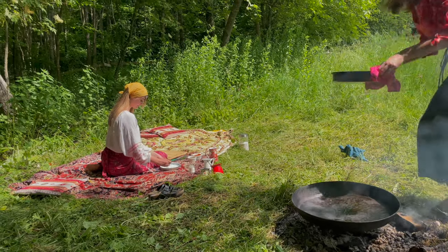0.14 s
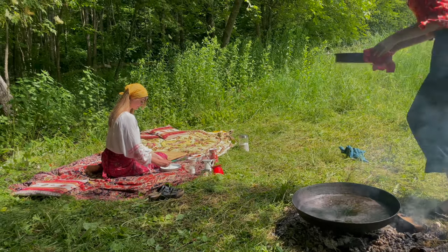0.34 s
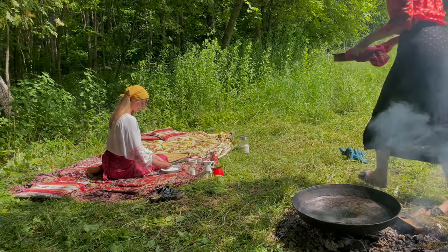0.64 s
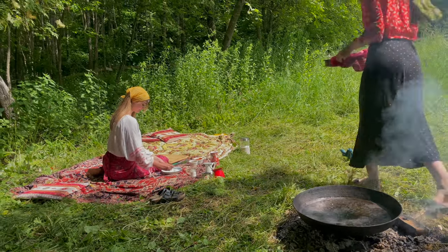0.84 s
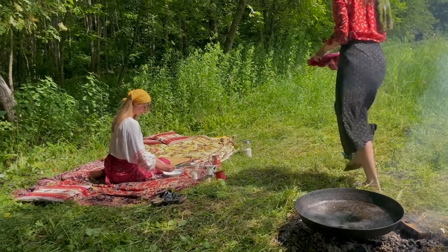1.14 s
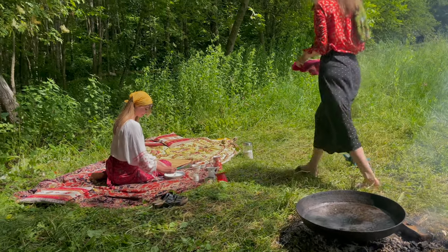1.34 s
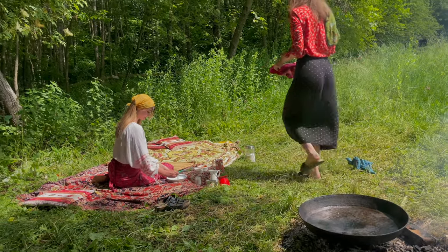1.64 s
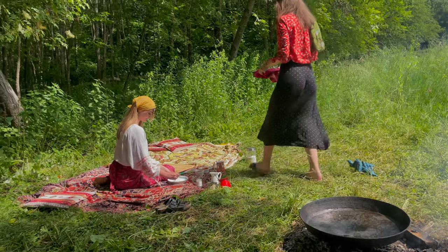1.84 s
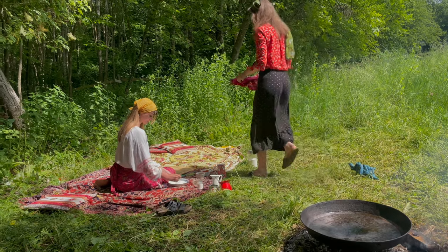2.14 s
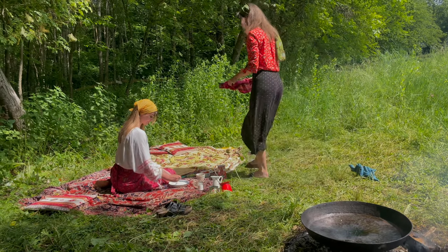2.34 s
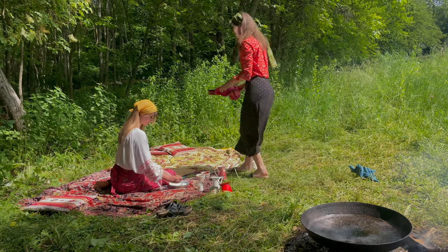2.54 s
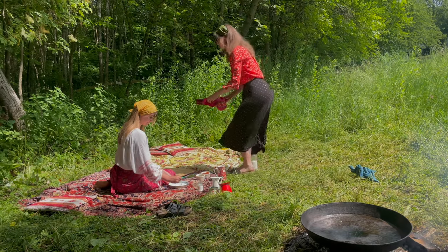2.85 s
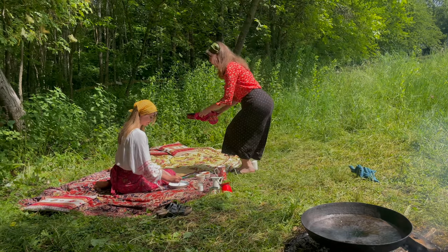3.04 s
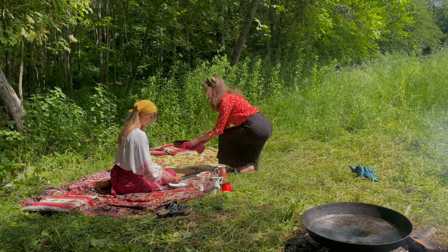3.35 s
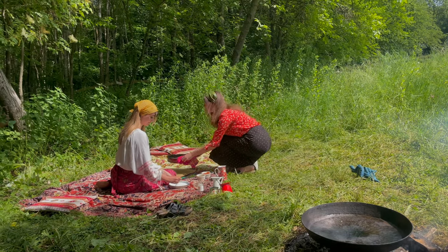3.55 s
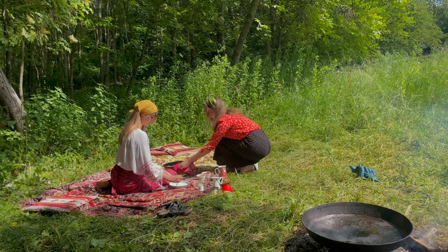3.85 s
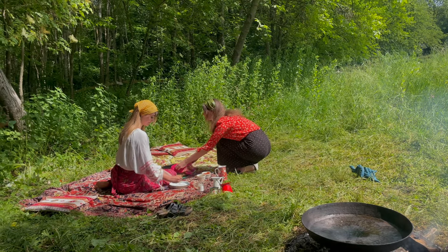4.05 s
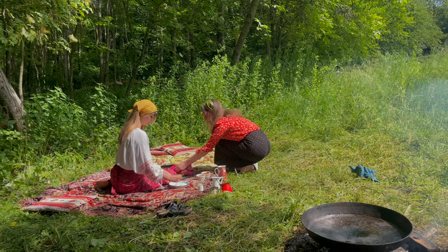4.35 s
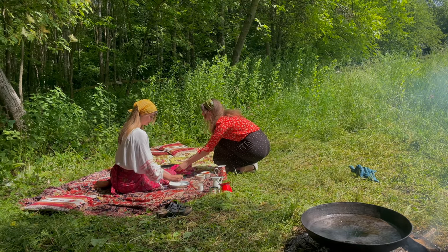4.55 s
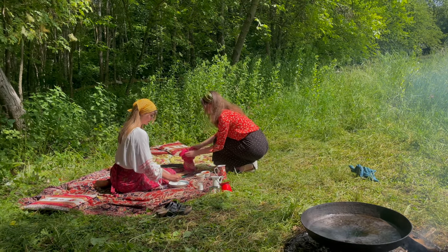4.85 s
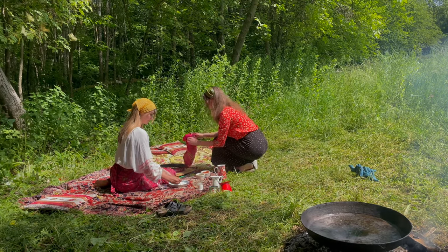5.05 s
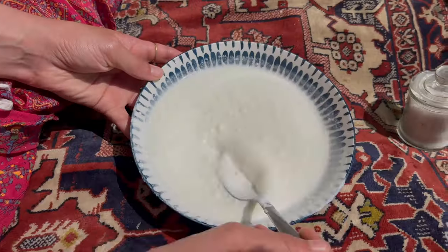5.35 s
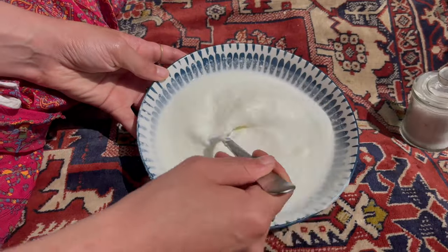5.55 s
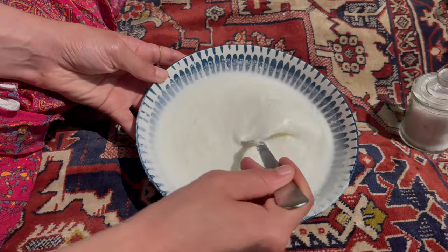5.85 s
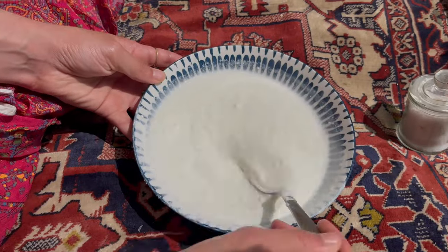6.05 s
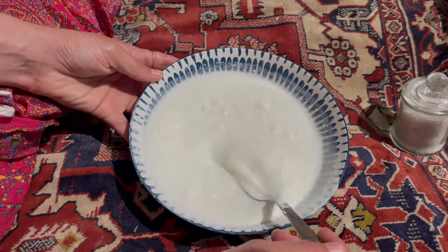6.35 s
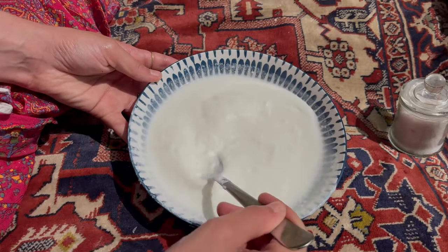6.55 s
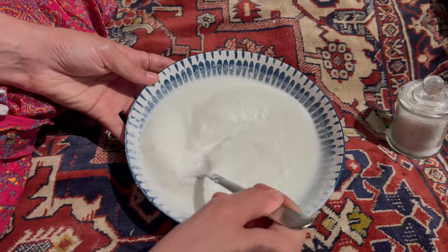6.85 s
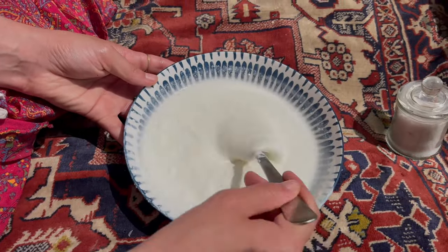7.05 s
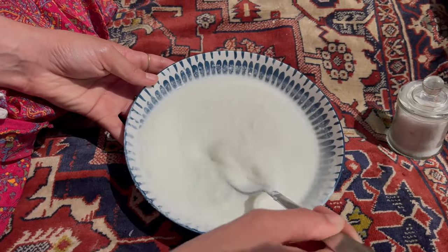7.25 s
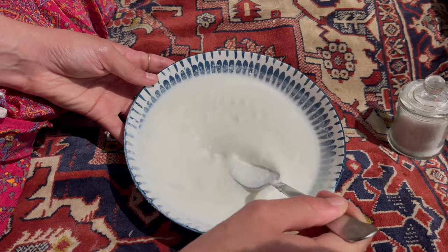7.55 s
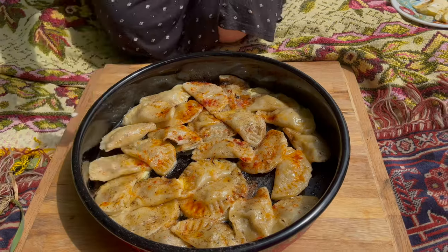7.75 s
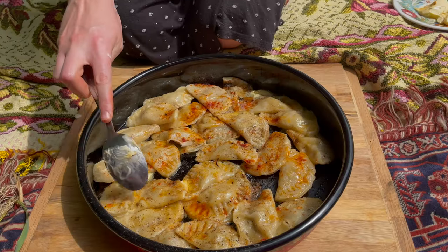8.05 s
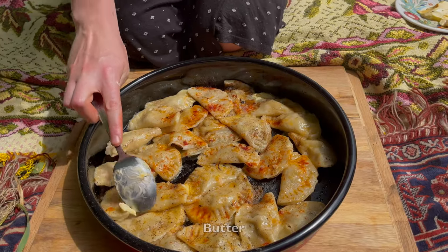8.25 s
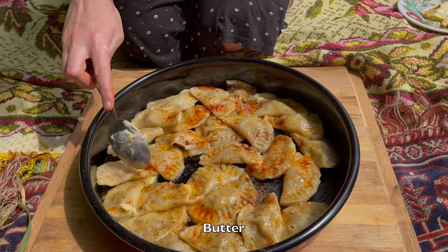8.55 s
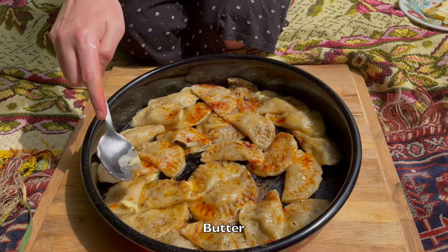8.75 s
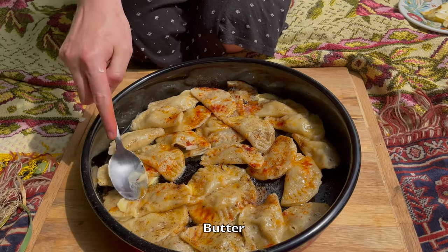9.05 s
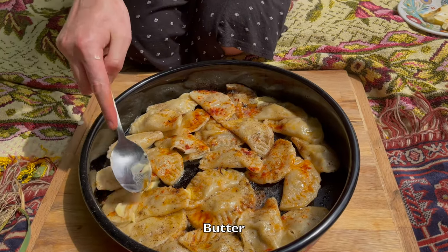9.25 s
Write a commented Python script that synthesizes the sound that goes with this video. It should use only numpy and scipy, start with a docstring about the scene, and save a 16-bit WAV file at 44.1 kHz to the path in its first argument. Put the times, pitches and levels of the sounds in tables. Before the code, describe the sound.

From 0 to 5.4 seconds, a low, uneven fire rumble dominates outdoors, with faint high sizzle and scattered dry snaps. Footsteps brush grass, mainly until 2 seconds, and a fly buzzes barely audibly around 0.3. Small, distant china clinks recur slightly to the left. Fluty birds chirp quickly, most actively from 2.6 to 4.6, over thin trills deep in the trees. Around 3.56 a pan lands with a thud and sharp crack, followed by duller knocks near 4.0 to 4.4 and soft cloth rustling. At 5.4 the rumble stops abruptly. Close and dry, a bright spoon strike on china at 5.6 leads into circular scraping, about three turns per second, with creamy swishes, tiny crackling bubbles and a lighter clink at 6.9. From 7.7, quiet breeze, soft thumps and far birds remain. A spoon ticks metal at 8.8, then strikes the pan at 8.97 with a short bright ring.

```python
"""Picnic at a forest edge

By a fire, a low rumble, fine sizzle and snaps are filtered noise; steps brush grass, a baking pan is set
down with damped knocks, and a bowl is stirred. The rumble stops abruptly: close by, a spoon stirs thick,
crackling cream in china, with friction and struck modes. Last, a spoon clinks on a round metal pan.
Birds sing throughout as gliding, fluttering tones, and a fly buzzes faintly in harmonics of its wingbeat.
"""
import sys
import numpy as np
from scipy import signal
from scipy.fft import rfft, irfft, next_fast_len
from scipy.io import wavfile
from scipy.ndimage import uniform_filter1d, map_coordinates

SR = 44100
rng = np.random.default_rng(int(sys.argv[2]) if len(sys.argv) > 2 else 0)


def wav_out(sig):
    """Save sig, one row per channel (or a flat mono array), as 16-bit PCM at SR to the path in sys.argv[1]."""
    wavfile.write(sys.argv[1], SR, np.round(np.clip(np.atleast_2d(sig).T, -1, 1) * 32767).astype(np.int16))


N = 414540

BOWL_FROM_S, PAN_FROM_S = 5.385, 7.73  # close to the bowl, then close to the pan
TOP_HZ = 15800  # upper band limit

# Table levels are relative; the functions add their own offsets.
# Spoon strikes on the bowl: [t/s, click level/dB, ring level re click/dB, favoured f/Hz]
CLINKS = [(0.167, -40.5, 3, 2220), (0.401, -37, 6.5, 1770), (.457, -36.5, 2, 1750), (0.961, -29.5, 5, 1690),
          (1.52, -27, -7, 1710), (1.5265, -19.5, -27, 1750), (1.598, -28, 0, 2250), (1.822, -34.5, 4, 2260),
          (1.863, -37, 1, 2300), (2.0838, -28, -14, 2300), (2.086, -31, -15, 2300), (2.356, -31.5, 7, 1750),
          (2.422, -37.5, 12, 2830), (2.662, -33, -2, 1700), (3.527, -27, -9, 1710), (3.682, -31, -6, 2300),
          (4.092, -32.5, 6.5, 1790), (4.433, -26.5, -9, 2320), (4.623, -30.5, -10, 1730),
          (4.698, -31.5, -3, 2300), (4.893, -32.5, 7, 1720), (4.986, -33.5, 2, 2370),
          (5.139, -27.5, -4, 2290), (5.204, -36.5, -13, 3450), (5.218, -38, 4.5, 2350),
          (5.582, -5.5, -6.5, 2460), (5.5868, -15, -13, 2490), (5.601, -28, -6, 2400),
          (5.653, -37, 0, 3450), (5.752, -53, 2, 2800), (5.918, -43, 2, 2580), (6.503, -36, -11, 2810),
          (6.545, -41, 4, 2580), (6.867, -17.5, -13, 3600), (7.722, -36.5, -13, 2550)]
# Ringing modes of the china bowl: [f/Hz, level/dB, t60/s]
BOWL_MODES = [(657, -18, .18), (1416, -15, .14), (1690, -17, .18), (1750, -5.5, .07), (2355, -7, .15),
              (2560, -10, .05), (2830, -12, .07), (3478, -7, .16), (4290, -10, .05), (4720, -12, .09),
              (5146, -18, .1), (8118, -28, .08)]
# Quickly damped modes of spoon and bowl in contact: [f/Hz, level/dB, t60/s]
CONTACT_MODES = [(1097, -4, 0.017), (1387, -24, 0.012), (1878, 2.5, 0.017), (2610, -5.5, 0.029),
                 (3362, -0.5, 0.03), (3824, -6, 0.03), (4264, -1.5, 0.028), (4650, 1, 0.022),
                 (5400, -34, 0.04), (5850, -15, .028), (7240, -21.5, 0.022), (8280, -22, 0.028)]
# Click spectrum of the china: [f/Hz, level/dB per Hz]
CHINA_CLICK = [(200, -51), (450, -38), (750, -5), (1300, 3), (1900, 1.5), (2500, 8.5), (3000, 2.5),
               (3450, 6), (3900, 3), (4350, -3), (5200, 7.5), (6500, -7), (8300, -4), (10500, -16),
               (15000, -20)]
# Colour of the bowl from afar: [f/Hz, level/dB]
DISTANCE = [(900, -1.5), (1800, 4.5), (2400, 5), (3500, -1), (4500, -4), (12000, -6)]
# Below this force the spoon stays on the wall and shortens the ring to this share
BOUNCE_DB, RESTING_SHARE = -18, .7
CLICK_DB, CONTACT_DB, SPOT_DB = -11, -15.5, 12  # shares of a clink; lift of the favoured mode

# Spoon strikes on the pan: [t/s, level/dB, crack t60/s, ring level re crack/dB]
PAN_HITS = [(8.809, -22.5, 0.011, -33), (8.9673, -20.5, 0.082, 5)]
# Long ringing modes of the pan wall: [f/Hz, level/dB, t60/s]
PAN_MODES = [(238, -14, .08), (593, -14, .13), (639, -12, .14), (1077, 0, .42), (1110, 0, .08),
             (1405, -10.5, .32), (1610, -10, .38), (1787, -19, .25), (2460, -19, .14), (3420, -19, .12),
             (1997, -8, .21), (2234, -11, .4), (2724, -22, .35), (2961, -8, .29), (3192, -23, .35),
             (3881, -16, .24), (4339, -12, .13), (4654, -16, .22), (4748, -19, .3), (5071, -9, .1),
             (5356, -14, .19), (5440, -17, .13), (6562, -19, .12), (6982, -20, .11), (7424, -16, .16),
             (7887, -19, .09), (8360, -23, .12), (9900, -25, .1), (11020, -19, .13)]
# Short bright modes of the rim and thump of the pan on its board: [f/Hz, level/dB, t60/s]
RIM_MODES = [(405, -4.5, 0.04), (590, 3.5, 0.035), (4740, -6.5, 0.18), (6200, 1, 0.07), (7350, -6, 0.038),
             (7800, 3, .04), (9070, -2, .05), (12400, -3, .03)]
# Spectra of a graze and of a blow on steel: [f/Hz, level/dB per Hz]
GRAZE_TICK = [(300, -20), (1100, -8), (1850, 11), (2800, 1), (4000, -6), (5500, 11.5), (8000, -13),
              (14000, -30)]
STEEL_CLICK = [(100, -31), (250, 6), (450, 6.5), (1100, -5), (3000, -1.5), (5000, -9), (7000, 3.5),
               (10000, -4), (15000, -16)]
WALL_DB, RIM_DB = -12, -14.5  # the long ring and the short one

# Scraping half of each turn of the spoon: [t/s, width/s, level/dB]
TURNS = [(5.548, 0.05, -45), (5.898, 0.057, -46.5), (6.209, .05, -47.5), (6.522, 0.056, -46.5),
         (6.795, 0.057, -48.5), (7.13, 0.025, -54.5), (7.425, 0.04, -46.5), (7.718, .025, -58)]
# Gliding half of each turn: [t/s, width/s, level/dB, favoured f/Hz]
GLIDES = [(3.1, 0.086, -61.5, 1720), (3.39, 0.054, -58.5, 1700), (3.65, 0.033, -57, 1750),
          (3.98, 0.07, -57.5, 1750), (5.43, 0.05, -55.5, 2720), (5.755, 0.048, -54, 2740),
          (6.075, 0.071, -52.5, 2280), (6.39, 0.083, -52.5, 1980), (6.68, 0.056, -53, 1670),
          (7.05, 0.11, -55.5, 2178), (7.324, 0.085, -53, 1940), (7.6, 0.11, -53.5, 2140),
          (7.73, .05, -62, 1672)]
# Bowl resonances under the scraping spoon: [f/Hz, width/Hz, level/dB]
RUBBED = [(1178, 110, -11), (1550, 55, -7.5), (2430, 400, -2.5), (2698, 108.4, 5), (3950, 780, -12)]
# Narrow tones of the bowl under a gliding spoon: [f/Hz, level/dB]
SINGING = [(1670, -5), (2760, -4.5), (3580, -17), (4020, -9), (4760, -6)]
# Spectrum of cream pushed by the spoon: [f/Hz, level/dB per Hz]
SWISH = [(450, -34.5), (900, 6.5), (3000, 2.5), (5000, 8.5), (6500, -2), (8300, -4), (10500, -23),
         (15000, -17)]
# Catches of steel on the glaze: rate, its scatter, size scatter, fine friction between them
SLIPS_PER_S, SLIP_UNEVEN, SLIP_SPREAD_DB, GRIT_DB = 280, .4, 4.5, -8
SINGING_LIFT_DB = 8  # lift of the tone that a glide favours
SLOSH_SHARE = .017  # scale of the bend that moving cream gives the bowl's tones
GLIDE_RUB_DB = -9  # light rubbing in a glide, relative to the glide
SWISH_DB, GLIDE_SWISH_DB = -10.5, -7.5  # cream pushed by each half turn, relative to it

# Cream closing behind the spoon: [t/s, width/s, level/dB]
SQUELCHES = [(5.735, 0.014, -52.5), (6.04, 0.016, -56), (6.365, 0.023, -55.5), (6.51, 0.015, -58),
             (6.8, .024, -54), (7.29, 0.045, -53.5), (7.42, .02, -63), (7.59, 0.095, -56.5),
             (7.74, 0.048, -56.5)]
# Spectrum of the tiny bubbles: [f/Hz, level/dB per Hz]
BUBBLES = [(1200, -15), (2600, -2), (3700, 14.5), (4400, -2), (6200, -13), (7700, 0.5), (9200, -9.5),
           (11000, -17), (15000, -24)]
# Single wet pops: [t/s, level/dB, f/Hz]
POPS = [(6.575, -54, 4640), (7.043, -46, 5740), (7.311, -49, 7400)]
BUBBLES_PER_S, POP_T60_S = 1500, 0.028

# Dull knocks of feet, pan and board: [t/s, level/dB, main resonance f/Hz, upper reach f/Hz]
KNOCKS = [(1.526, -34.5, 1100, 1400), (2.083, -25, 230, 397), (3.562, -18.5, 219, 347),
          (3.565, -27, 600, 1090), (3.585, -26.5, 850, 950), (3.76, -35.5, 600, 900),
          (4.004, -16.5, 360, 1240), (4.2634, -21, 450, 830), (4.389, -31.5, 336, 700),
          (4.419, -21.5, 700, 930), (5.425, -33, 298, 390), (5.49, -35, 263, 430), (7.745, -34, 377.6, 497),
          (7.823, -40, 263, 500), (7.894, -41.5, 330, 470), (8.255, -32, 260, 563)]
# Modes of the board: [f/Hz, level/dB, t60/s]
BOARD_MODES = [(345, 6, 0.088), (613, -10, 0.2), (938, -8.5, 0.057), (1114, -3, 0.095), (1217, -7.5, 0.079),
               (1725, -4, 0.032), (2190, -6.5, 0.024)]
KNOCK_T60_S = 0.048
HARD_KNOCK_DB = -22  # above this force the board's ring grows faster than the knock
BOARD_DB, BOARD_GROWS = -27, 2.96  # ring relative to a knock; dB gained per dB of extra force

# Embers and twigs snapping: [t/s, level/dB]
SNAPS = [(.102, -46), (.183, -47.5), (0.242, -33.5), (.573, -38), (0.643, -35), (.684, -37), (0.948, -34),
         (1.239, -38), (3.031, -28.5), (3.563, -9), (3.574, -26), (3.584, -12.5), (5.217, -32.5),
         (5.223, -35.5)]
# Spectrum of a snap: [f/Hz, level/dB per Hz]
SNAP = [(200, 9), (1000, -2), (2700, -18.5), (3700, 2.5), (4400, -2.5), (6100, 2.5), (7900, -5.5),
        (9500, -1), (11000, -1.5), (12500, 4.5), (16000, -15.5)]

# Fluty tones: a singer nearby, except the first row, the far bowl singing under the spoon: [t/s, length/s, f/Hz
# at start, one third, two thirds and end, level/dB, flutter/Hz]
NOTES = [(2.15, .15, 1880, 1840, 1770, 1700, -59, 15), (2.638, .04, 3300, 3200, 3020, 2950, -51, 40),
         (2.664, .026, 3350, 3500, 3500, 3400, -54, 30), (2.67, .04, 2850, 3150, 3280, 2900, -53, 50),
         (2.703, .016, 3350, 3480, 3450, 3300, -56, 50), (2.935, .024, 3330, 3220, 3080, 2950, -52, 30),
         (2.97, .027, 2880, 3020, 3070, 3020, -48, 15), (3.08, .044, 3470, 3530, 3570, 3520, -51, 15),
         (3.128, .026, 4100, 3980, 3880, 3780, -53, 50), (3.196, .036, 3020, 2920, 2880, 2950, -50, 20),
         (3.228, .034, 2950, 3120, 3050, 2850, -50.5, 25), (3.335, .036, 2770, 2790, 2850, 3020, -55, 20),
         (3.368, .05, 3000, 3280, 3100, 2480, -46.5, 20), (3.459, .052, 2640, 2650, 2740, 2680, -52, 25),
         (3.668, .066, 2650, 2870, 2650, 2520, -53, 25), (3.738, .026, 4050, 3930, 3880, 3820, -55, 50),
         (3.805, .03, 3050, 3130, 3180, 3170, -55, 15), (3.836, .056, 3220, 3240, 3290, 3350, -46, 15),
         (3.885, .042, 3350, 3270, 3050, 2850, -49.5, 20), (4.028, .05, 4600, 4300, 4130, 4050, -54, 130),
         (4.068, .06, 4020, 3830, 3760, 3780, -51, 50), (4.256, .055, 3650, 3300, 2900, 2700, -53, 110),
         (4.448, .055, 3900, 3880, 3720, 3600, -52, 110), (4.558, .11, 2820, 2960, 2900, 2770, -48.5, 12)]
# Thin phrase from deep in the trees: [t in phrase/s, length/s, start f/Hz, end f/Hz, level/dB, buzz/Hz]
PHRASE = [(0, 0.064, 5300, 4550, 6, 80), (0.18, 0.091, 6400, 6700, 5.5, 350),
          (0.351, 0.084, 4410, 4350, 6.5, 80), (0.437, 0.336, 4980, 4960, 4.5, 140),
          (0.949, 0.18, 7300, 6600, 4.5, 80)]
# Each time the phrase is sung: [t/s, level/dB]
PHRASES = [(0.047, -62.5), (6.555, -59.5)]
# Single far trills, except the row at 2.771 s, the far bowl singing under the spoon: [t/s, length/s, start
# f/Hz, end f/Hz, level/dB]
TRILLS = [(1.82, 0.12, 6370, 6190, -60.5), (2.434, 0.36, 2370, 2286, -57.5), (2.771, 0.14, 1794, 1720, -58),
          (3.228, 0.152, 4050, 3960, -65.5), (3.389, 0.64, 4970, 4880, -62.5),
          (4.11, 0.12, 3810, 3790, -65), (6.172, 0.21, 5330, 5060, -57.5), (6.227, 0.33, 4510, 4390, -61),
          (7.012, 0.07, 4950, 4820, -59), (7.682, 0.11, 4750, 3650, -59), (7.849, 0.14, 3400, 3090, -62.5),
          (8.096, 0.25, 4030, 3400, -63.5), (8.285, 0.14, 4420, 4080, -69), (8.361, 0.18, 3440, 3100, -70),
          (8.569, 0.15, 2280, 2740, -76), (9.13, 0.153, 5350, 5390, -66), (9.218, 0.14, 2970, 3420, -63)]
SINGER_DB = -0.5  # overall offset of the fluty tones
TRILL_BUZZ_PER_S = 0.17  # longer trills buzz more deeply

# Fire rumble and sizzle over time: [t/s, level/dB]
RUMBLE = [(0.0, -41.5), (1.69, -49.5), (2.27, -45), (2.59, -47.5), (3.63, -39), (4.5, -44), (5.2, -40.5)]
SIZZLING = [(0.0, -63), (0.63, -65.5), (0.8, -59.5), (1.11, -67), (1.51, -59.5), (1.9, -59.5),
            (2.19, -68.5), (2.73, -62), (3.03, -74.5), (3.58, -68.5), (4.11, -75.5), (4.7, -72),
            (5.25, -68)]
# Spectra of the deepest rumble, the roar and the sizzle: [f/Hz, level/dB per Hz]
DEEP = [(12, -40), (20, -29), (36, -13.5), (54, -3.5), (74, -3), (113, -17), (140, -12.5), (180, -29),
        (310, -120)]
ROAR = [(59, -40.5), (100, -3), (119, -3.5), (231, 4), (297, 3), (403, -11.5), (453, -12.5), (556, -35.5),
        (650, -41), (840, -55.5), (1430, -120)]
SIZZLE = [(3820, -33.5), (6500, 1), (7560, -19.5), (9510, -16), (11000, 7.5), (12200, 7.5), (15600, -9),
          (16000, -10)]
SIZZLE_SURGE_DB = 4.6  # scale of the quick surges
DEEP_DB, DEEP_FOLLOWS = -44, 0.23  # the deepest layer: mean level, share of the rumble's swings

# Feet brushing through grass: [t/s, width/s, level/dB]
STEPS = [(.3, 0.1, -54.5), (.8, 0.045, -55), (0.932, 0.078, -48), (1.31, 0.11, -48), (1.56, 0.18, -60),
         (1.88, 0.15, -53), (2.08, 0.05, -59), (2.6, 0.76, -57.5), (3.57, 0.072, -47.5)]
# Spectrum of the grass: [f/Hz, level/dB per Hz]
GRASS = [(300, -46), (900, 2), (1800, 6.5), (4000, 1), (7000, -1.5), (14000, -14)]
# Cloth handled around the pan: [t/s, width/s, level/dB]
RUSTLES = [(3.345, 0.038, -51.5), (4.55, 0.18, -53)]
# Spectrum of the cloth: [f/Hz, level/dB per Hz]
CLOTH = [(150, -24), (400, -6), (700, 5), (950, -4), (1450, -11), (4500, -40)]

# Overtones of the fly: [multiple of the wingbeat, level/dB]
FLY = [(4, -3.5), (5, 3.5), (6, 2.5), (7, -2), (8, -1)]

# Forest spectra by the fire and in the close views: [f/Hz, level/dB per Hz]
FOREST_WIDE = [(200, 9), (500, 4), (900, -3), (1300, -4), (1700, 5), (2300, -0.5), (4700, -1),
               (5700, -11.5), (8500, -19), (13000, -26), (20000, -79)]
FOREST_CLOSE = [(150, -12), (300, -8.5), (600, -9.5), (1000, -13), (1500, -2), (2500, -7), (4000, -8.5),
                (5200, -13), (6800, -24), (12000, -38)]
# Spectra of the breeze and the even hiss: [f/Hz, level/dB per Hz]
WIND = [(12, -9), (20, -0.5), (39, -4.5), (54, -11.5), (107, -16), (189, -23.5), (400, -35.5), (520, -62),
        (880, -120)]
HISS = [(500, 2), (5000, -8), (9500, 0), (11000, -4), (14200, -9), (16000, -18)]
BREEZE_BOWL_DB, BREEZE_PAN_DB, GUST_DB = -53, -48, 2  # breeze near bowl and pan, scale of its swings
# Echo of the trees: [f/Hz, t60/s]
TREES = [(200, 0.23), (2000, 0.58), (6000, 0.88), (14000, 0.29)]


def amp(db):
    """Level: decibels to linear gain."""
    return 10 ** (np.asarray(db) / 20)


def unit(x):
    """Normalisation: scale to rms 1."""
    return x / np.sqrt(np.mean(x ** 2) + 1e-20)


def along(points, hz):
    """Interpolation of (f/Hz, value) points on a logarithmic frequency axis."""
    f, v = np.transpose(points)
    return np.interp(np.log(hz + 1), np.log(f + 1), v)


def clock(length):
    """Sample times of a short sound."""
    return np.arange(int(length * SR)) / SR


def curve(rows):
    """Linear interpolation of (t/s, value) rows to one value per sample."""
    s, values = np.transpose(rows)
    return np.interp(np.arange(N) / SR, s, values)


def shot(start, end):
    """Gating: 1 between two times, 0 outside, with brief ramps."""
    t = np.arange(N) / SR
    return uniform_filter1d(1. * ((t >= start) & (t < end)), size=128)


def swell(s, width, order=2):
    """Envelope: width seconds wide at half power; a higher order has steeper edges."""
    distance = np.abs(2 * (np.arange(N) / SR - s) / width)
    return 2 ** (-.5 * np.minimum(distance ** order, 80))


def swells(rows):
    """Superposition of (t/s, width/s, level/dB) envelopes."""
    return sum(amp(db) * swell(s, width) for s, width, db in rows)


def wobble(rate, n):
    """Random modulation: a smooth curve with rate knots a second."""
    knots = rng.standard_normal(int(n * rate / SR) + 4)
    return map_coordinates(knots, [np.arange(n) * rate / SR])


def filtered(x, response):
    """Linear filtering: multiply the spectrum by a response of frequency."""
    n = x.shape[-1]
    m = next_fast_len(n + 8192)
    return irfft(rfft(x, m) * response(np.fft.rfftfreq(m, 1 / SR)), m)[..., :n]


def shaped(x, spectrum):
    """Spectral colouring by a table of levels."""
    return filtered(x, lambda hz: amp(along(spectrum, hz)))


def noise(spectrum, n):
    """Coloured noise: shaped Gaussian noise of rms 1."""
    return unit(shaped(rng.standard_normal(n), spectrum))


def wide(spectrum, side_db):
    """Stereo coherence: a common noise plus an independent one in opposite phase."""
    return noise(spectrum, N) + amp(side_db) * np.array([[1], [-1]]) * noise(spectrum, N)


def leaning(x, left_db):
    """Interaural level difference: shift a stereo sound to the left."""
    return x * amp(np.array([[left_db], [-left_db]]) / 2)


def add(track, s, sound):
    """Superposition: mix a sound in at s seconds."""
    part = track[max(round(s * SR), 0):][:len(sound)]
    part += sound[:len(part)]


def ring(modes, t, scatter_db):
    """Modal decay: exponentially damped sines with new strengths and phases at each strike."""
    out = 0
    for hz, db, t60 in modes:
        decay = amp(db + scatter_db * rng.normal() - 60 * t / t60)
        out = out + decay * np.sin(2 * np.pi * (hz * t + rng.random()))
    return out


def burst(spectrum, t, t60):
    """Contact noise: a decaying burst whose energy depends on its decay alone."""
    fade = amp(-60 * t / t60)
    x = noise(spectrum, len(t)) * fade
    return x * np.linalg.norm(fade) / np.linalg.norm(x)


def outdoors(x, wet_db, spread_db):
    """Outdoor scattering: direct sound, quick scatter from nearby things, and the echo of the trees."""
    hz, t, z = signal.stft(rng.standard_normal((2, SR // 2)), SR, nperseg=256)
    decay = amp(-60 * t / along(TREES, hz)[:, None])
    tail = signal.istft(z * decay, SR, nperseg=256)[1]
    echo = signal.fftconvolve(x[None], tail / np.linalg.norm(tail[0]), axes=1)[:, :N]
    near = rng.standard_normal(512) * amp(-60 * np.arange(512) / SR / 0.066)
    side = signal.fftconvolve(x, near / np.linalg.norm(near))[:N]
    return x + amp(wet_db) * echo + amp(spread_db) * np.array([side, -side])


def bowl_clinks():
    """Impact excitation: a hard click, then modes damped by the cream and favoured by the struck spot."""
    out, t = np.zeros(N), clock(0.51)
    for s, db, ring_db, spot_hz in CLINKS:
        click = amp(CLICK_DB) * burst(CHINA_CLICK, t, t60=0.022)
        click = click + amp(CONTACT_DB) * ring(CONTACT_MODES, t, scatter_db=.7)
        # moving cream detunes the bowl a little from hit to hit
        load = 1 + rng.normal(0, .004)
        ring_share = 1 if db > BOUNCE_DB else RESTING_SHARE
        modes = []
        for hz, level, t60 in BOWL_MODES:
            # the mode with an antinode at the struck spot gets the largest lift
            lift_db = SPOT_DB * np.exp(-(np.log(hz / spot_hz) / 0.061) ** 2)
            modes.append((hz * load, level + lift_db, t60 * ring_share))
        ringing = amp(ring_db - 20.5) * ring(modes, t, scatter_db=0.5)
        onset = 1 - np.exp(-t / 0.000143)
        add(out, s, amp(db) * (click + ringing) * onset)
    afar = shot(0, BOWL_FROM_S)
    distant = outdoors(shaped(out * afar, DISTANCE), wet_db=-8, spread_db=-3.0)
    close = outdoors(out * (1 - afar), wet_db=-36, spread_db=-49)
    return leaning(distant, left_db=9) + close


def pan_clinks():
    """Impact on steel: a graze mostly ticks; a blow cracks brightly and sets the wall ringing."""
    out, t = np.zeros(N), clock(.6)
    for (s, db, t60, ring_db), colour in zip(PAN_HITS, [GRAZE_TICK, STEEL_CLICK]):
        crack = amp(-6.0) * burst(colour, t, t60)
        wall = amp(WALL_DB) * ring(PAN_MODES, t, scatter_db=.3)
        rim = amp(RIM_DB) * ring(RIM_MODES, t, scatter_db=.3)
        onset = 1 - np.exp(-t / 0.00018)
        add(out, s, amp(db) * (crack + amp(ring_db) * (wall + rim)) * onset)
    return outdoors(out, wet_db=-52, spread_db=-58)


def slip_friction():
    """Stick-slip friction: uneven catches of steel on the glaze over fine grit."""
    slip_rate = SLIPS_PER_S * np.exp(SLIP_UNEVEN * wobble(200, N))
    catches = np.diff(np.floor(np.cumsum(slip_rate) / SR), prepend=0)
    slips = catches * amp(SLIP_SPREAD_DB * wobble(220, N))
    return unit(slips) + amp(GRIT_DB) * rng.standard_normal(N)


def rubbed_body(f):
    """Resonant transmission: the bowl's resonances in alternating sign, with a treble roll-off."""
    body = 0
    for k, (centre, width, db) in enumerate(RUBBED):
        damping = 1j * f * width
        body = body + (-1) ** k * amp(db) * damping / (centre ** 2 - f ** 2 + damping)
    return body / (1 + (f / 5200) ** 4)


def singing(glides, bent_time):
    """Friction-driven resonance: narrow tones strongest near the frequency the rubbed spot favours."""
    out = 0
    for hz, db in SINGING:
        drive = 0
        for gain, favoured_hz in glides:
            closeness = np.exp(-(np.log(hz / favoured_hz) / 0.3) ** 2)
            drive = drive + gain * amp(SINGING_LIFT_DB * closeness)
        out = out + drive * amp(db) * wobble(150, N) * np.sin(2 * np.pi * hz * bent_time)
    return out


def stirring():
    """Friction excitation: the spoon glides so the china sings, scrapes in slips, and swishes the cream."""
    scraping = sum(amp(db) * swell(s, width, order=3) for s, width, db in TURNS)
    glides = [(amp(db) * swell(s, width), favoured_hz) for s, width, db, favoured_hz in GLIDES]
    gliding = sum(gain for gain, _ in glides)
    # sloshing cream loads the wall and bends all its tones together
    bent_time = np.cumsum(1 + np.clip(SLOSH_SHARE * wobble(9, N), -.1, .1)) / SR
    rubbed = filtered(slip_friction(), rubbed_body)
    scrape = unit(map_coordinates(rubbed, [bent_time * SR], mode="mirror"))
    # the swish is heard only close to the bowl
    swish = unit(noise(SWISH, N) * amp(3.7 * wobble(380, N))) * shot(BOWL_FROM_S, PAN_FROM_S)
    out = (scraping + amp(GLIDE_RUB_DB) * gliding) * scrape
    out = out + singing(glides, bent_time)
    out = out + (amp(SWISH_DB) * scraping + amp(GLIDE_SWISH_DB) * gliding) * swish
    return leaning(outdoors(out, wet_db=-23, spread_db=-39), left_db=1.0)


def cream():
    """Bubble bursting: random impulses swell in clumps behind the spoon; larger bubbles pop singly."""
    bursts = (rng.random(N) < BUBBLES_PER_S / SR) * rng.standard_normal(N)
    out = swells(SQUELCHES) * unit(shaped(bursts, BUBBLES))
    t = clock(.04)
    for s, db, hz in POPS:
        colour = [(hz / 3, -25), (hz * .75, -8), (hz, 0), (hz * 1.3, -8), (hz * 2, -25)]
        add(out, s, amp(db) * burst(colour, t, POP_T60_S))
    return outdoors(out, wet_db=-26, spread_db=-26)


def knocks():
    """Damped impact: soft contacts push a broad resonance; harder ones ring the board more strongly."""
    out, t = np.zeros(N), clock(0.27)
    for s, db, hz, top in KNOCKS:
        force = max(db - HARD_KNOCK_DB, 0)
        colour = [(hz / 6, -20), (hz * .5, -5), (hz * .9, 0), (top, -3), (top * 1.45, -19), (top * 5, -48)]
        thud = amp(-2.5) * burst(colour, t, KNOCK_T60_S)
        board = amp(BOARD_DB + BOARD_GROWS * force) * ring(BOARD_MODES, t, scatter_db=3.5)
        # the board rings only by the fire
        board = board * (s < BOWL_FROM_S)
        add(out, s, amp(db) * (thud + board) * (1 - np.exp(-t / 0.0018)))
    return leaning(outdoors(out, wet_db=-15.5, spread_db=-8.0), left_db=2.5)


def snaps():
    """Sudden fracture: dry, very short noise cracks of embers and twigs."""
    out, t = np.zeros(N), clock(0.065)
    for s, db in SNAPS:
        add(out, s, amp(db - 7.5) * burst(SNAP, t, t60=0.019))
    return leaning(outdoors(out, wet_db=-40, spread_db=-3), left_db=1.5)


def whistle(length, pitches, buzz_hz):
    """Frequency modulation: a note bends through evenly spaced pitches with a flutter of the syrinx."""
    t = clock(length)
    u = t / length
    bend = np.polyfit(np.linspace(0, 1, len(pitches)), pitches, len(pitches) - 1)
    hz = np.polyval(bend, u) + buzz_hz * wobble(520, len(t))
    loudness = np.sqrt(np.sin(np.pi * u)) * amp(2.8 * wobble(70.2, len(t)))
    return unit(loudness * np.sin(2 * np.pi * np.cumsum(hz) / SR))


def birds():
    """Direct and scattered song: a fluty singer nearby; a thin phrase and trills blurred by the forest. Two
    glides of the far bowl singing under the spoon are played among them."""
    near, far = np.zeros(N), np.zeros(N)
    for s, length, *pitches, db, flutter_hz in NOTES:
        add(near, s, amp(db + SINGER_DB) * whistle(length, pitches, flutter_hz))
    for start, phrase_db in PHRASES:
        for s, length, from_hz, to_hz, db, buzz_hz in PHRASE:
            # each note glides early, then settles
            pitches = [from_hz, to_hz + 0.2 * (from_hz - to_hz), to_hz]
            add(far, start + s, amp(phrase_db + db - 5.5) * whistle(length, pitches, buzz_hz))
    for s, length, from_hz, to_hz, db in TRILLS:
        buzz_hz = from_hz * TRILL_BUZZ_PER_S * length
        add(far, s, amp(db - 1.5) * whistle(length, [from_hz, to_hz], buzz_hz))
    return outdoors(near, wet_db=-6, spread_db=1) + outdoors(far, wet_db=0.0, spread_db=-0.5)


def fire_rumble():
    """Low-frequency turbulence noise: a lumpy roar over a deeper layer that partly follows it."""
    rumble_db = curve(RUMBLE)
    deep_db = DEEP_DB + DEEP_FOLLOWS * (rumble_db - rumble_db.mean())
    deep = amp(deep_db + 1.36 * wobble(11, N)) * wide(DEEP, side_db=-24.5)
    roar = amp(rumble_db + 0.5 + 2.07 * wobble(14, N)) * wide(ROAR, side_db=-14.5)
    return leaning(deep + roar, left_db=3.0)


def fire_sizzle():
    """Amplitude-modulated treble noise: fast grains within slower surges."""
    spitting = amp(3.4 * wobble(900, N) + 2.2 * wobble(40, N))
    grains = unit(wide(SIZZLE, side_db=-39) * spitting)
    return amp(curve(SIZZLING) + 2.0 + SIZZLE_SURGE_DB * wobble(12, N)) * grains


def grass_steps():
    """Brushing friction: each step through the grass swells a grainy noise."""
    return swells(STEPS) * unit(wide(GRASS, side_db=2.0) * amp(2.54 * wobble(150, N)))


def cloth_rustles():
    """Fabric friction: handling swells a dull, uneven noise."""
    rustle = unit(wide(CLOTH, side_db=-3) * amp(1.7 * wobble(110, N)))
    return leaning(swells(RUSTLES) * rustle, left_db=3.0)


def fireside():
    """Superposition by the fire: rumble, sizzle, steps, cloth and the hush of the forest."""
    hush = amp(-53.5) * forest(FOREST_WIDE, patchy_db=3.5)
    layers = fire_rumble() + fire_sizzle() + grass_steps() + cloth_rustles() + hush
    return layers * shot(0, BOWL_FROM_S)


def fly():
    """Harmonic radiation: overtones of a slightly unsteady wingbeat swell and fade in a faint buzz."""
    wing_hz = 188 * (1 + 0.0121 * wobble(12.3, N))
    phase = 2 * np.pi * np.cumsum(wing_hz) / SR
    buzz = sum(amp(db) * np.sin(round(k) * phase) for k, db in FLY)
    return amp(-62.0) * swell(0.32, .25) * unit(buzz)


def forest(spectrum, patchy_db):
    """Diffuse field: leaves and far birds, unrelated in each ear, swell in time-frequency patches."""
    z = signal.stft(rng.standard_normal((2, N)), nperseg=512)[2]
    field = uniform_filter1d(rng.standard_normal(z.shape[1:]), size=6, axis=0)
    field = uniform_filter1d(field, size=24, axis=1)
    pair = signal.istft(z * amp(patchy_db * unit(field)), nperseg=512)[1][:, :N]
    return unit(shaped(pair, spectrum))


def quiet_air():
    """Ambient noise close by: a light breeze, distant leaves and an even hiss."""
    close = shot(BOWL_FROM_S, N / SR)
    strength = amp(BREEZE_BOWL_DB) * shot(BOWL_FROM_S, PAN_FROM_S)
    strength = strength + amp(BREEZE_PAN_DB) * shot(PAN_FROM_S, N / SR)
    breeze = strength * amp(GUST_DB * wobble(6, N)) * wide(WIND, side_db=-13.5)
    leaves = amp(-58) * forest(FOREST_CLOSE, patchy_db=2.0)
    hiss = amp(-75.5) * wide(HISS, side_db=-25)
    return breeze + (leaves + hiss) * close


def scene():
    """Superposition of all sources."""
    spoon = bowl_clinks() + pan_clinks() + stirring() + cream()
    return spoon + knocks() + snaps() + birds() + fireside() + fly() + quiet_air()


def record(dry):
    """Band limitation: a steep low-pass response."""
    return filtered(dry, lambda hz: 1 / np.sqrt(1 + (hz / TOP_HZ) ** 120))


dry = scene()
out = record(dry)
wav_out(out)
```